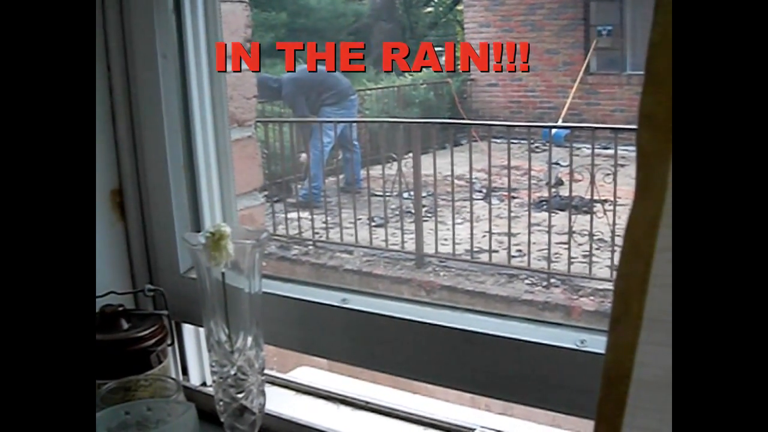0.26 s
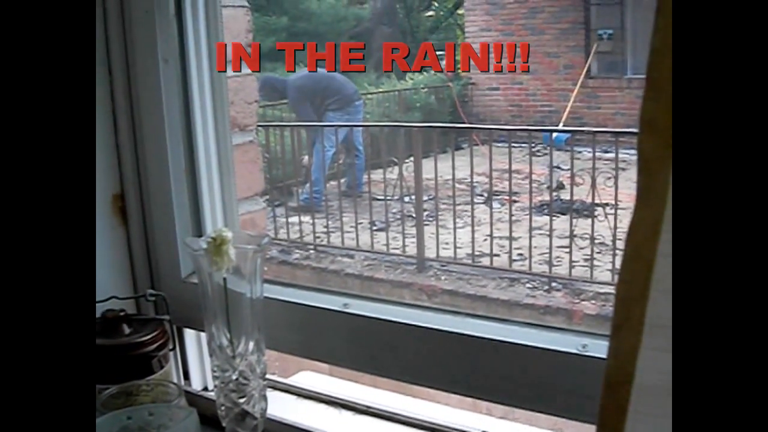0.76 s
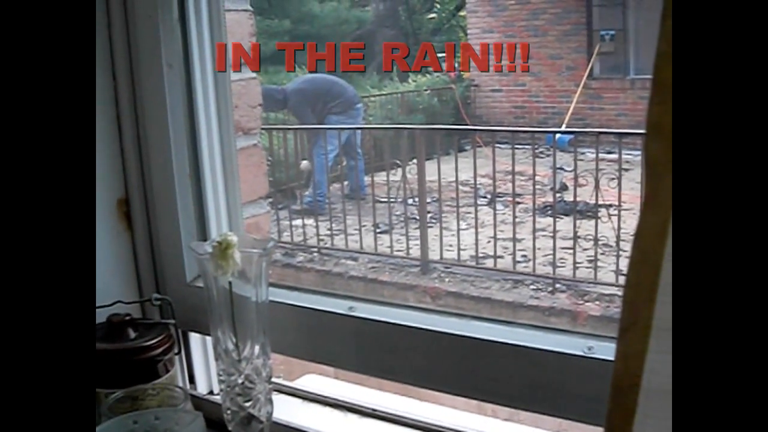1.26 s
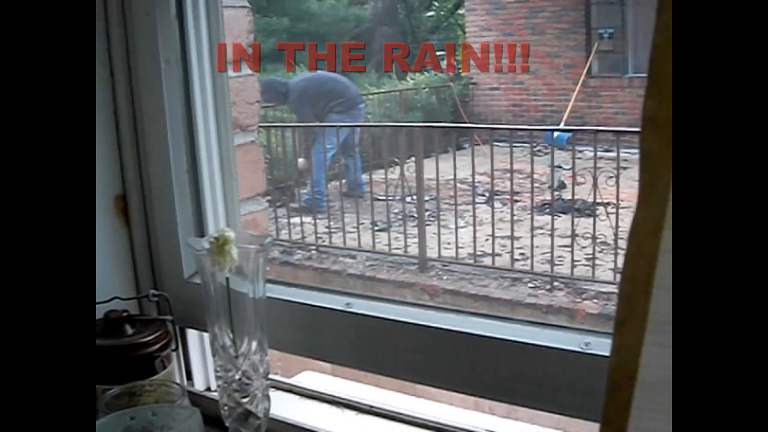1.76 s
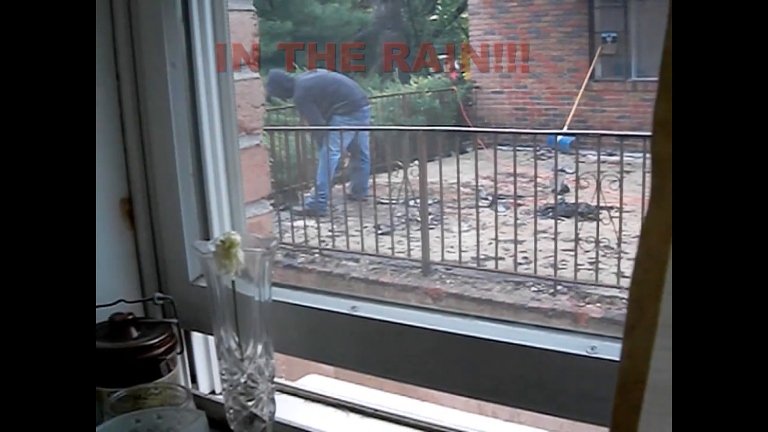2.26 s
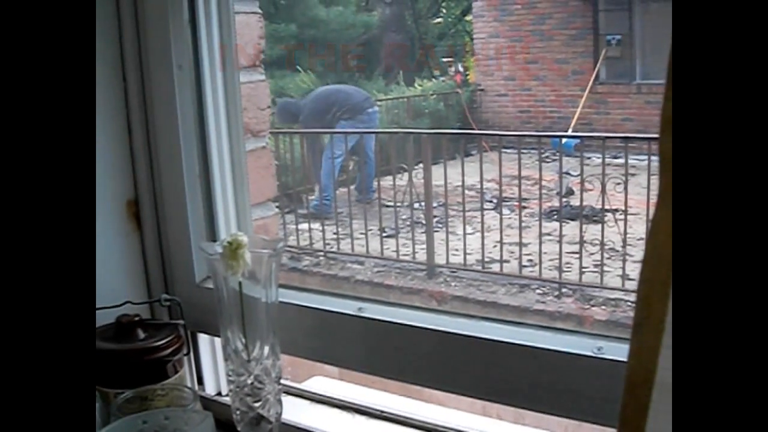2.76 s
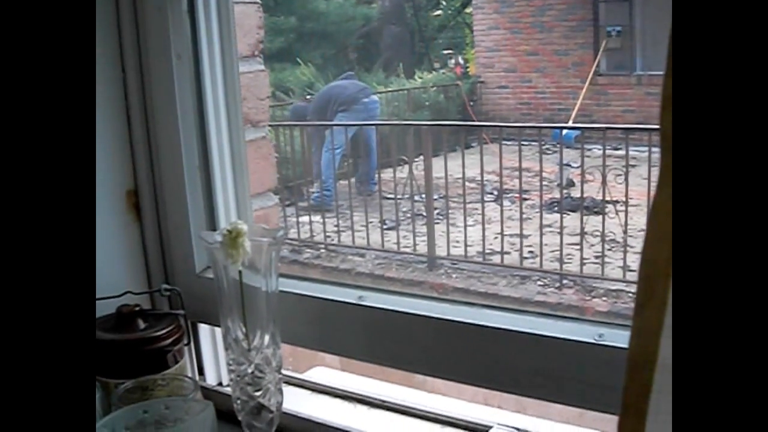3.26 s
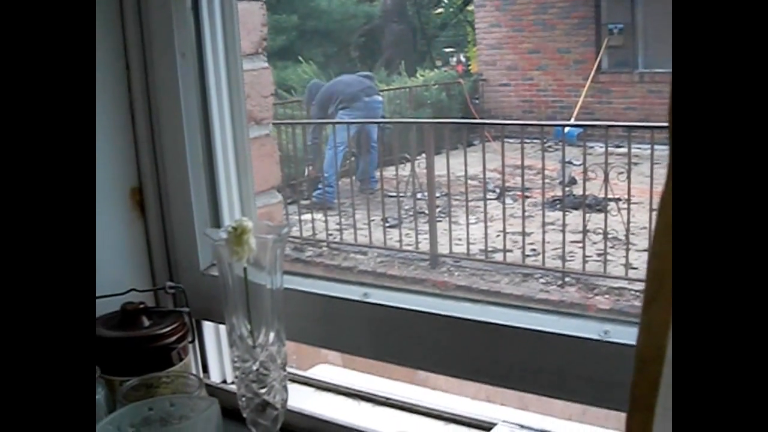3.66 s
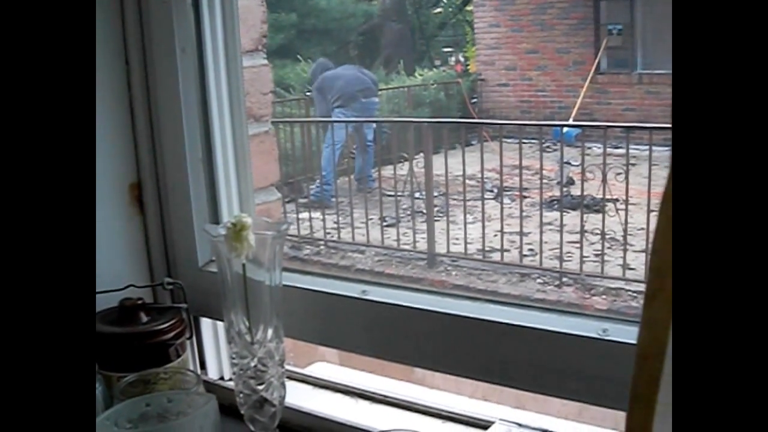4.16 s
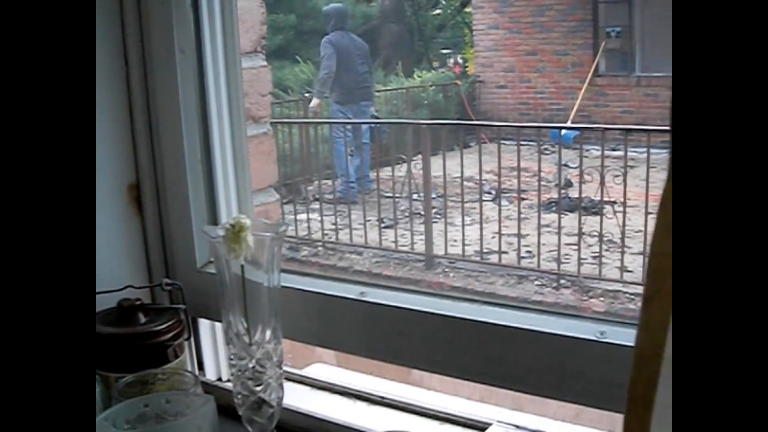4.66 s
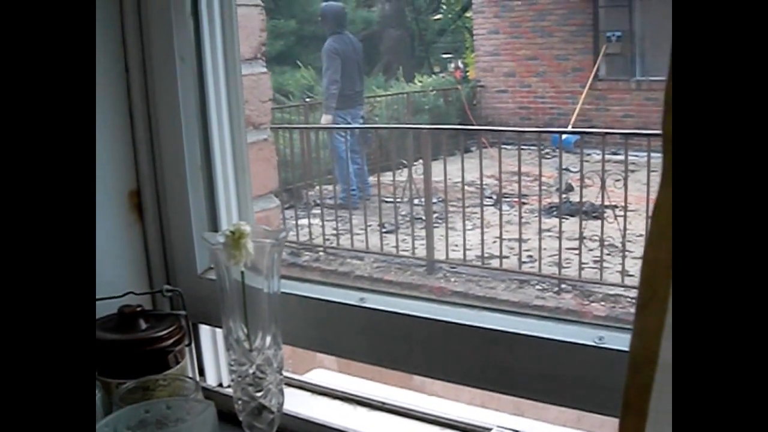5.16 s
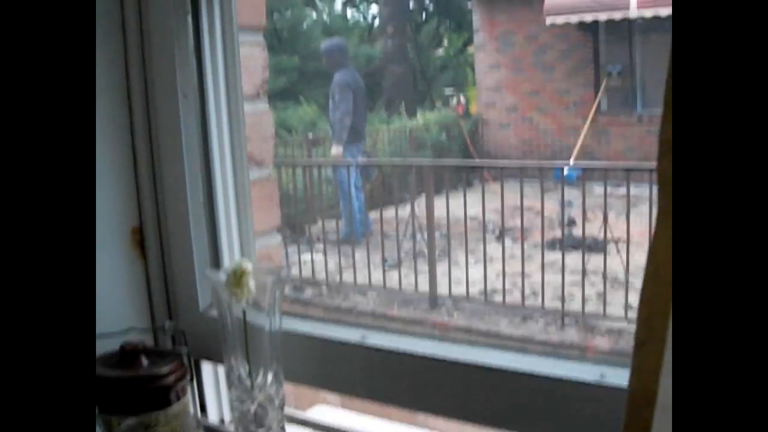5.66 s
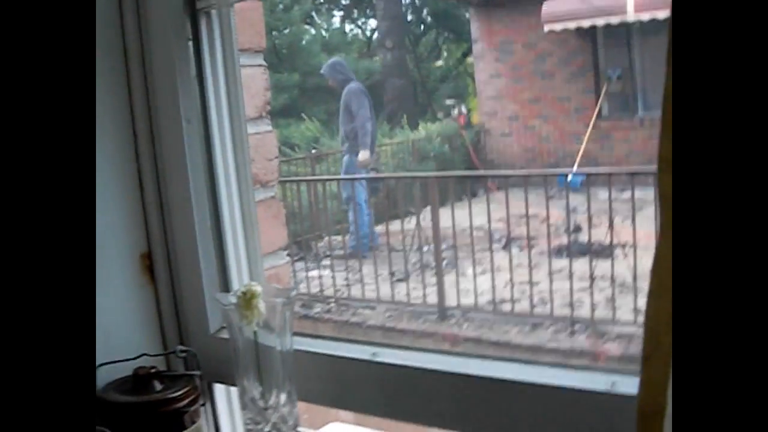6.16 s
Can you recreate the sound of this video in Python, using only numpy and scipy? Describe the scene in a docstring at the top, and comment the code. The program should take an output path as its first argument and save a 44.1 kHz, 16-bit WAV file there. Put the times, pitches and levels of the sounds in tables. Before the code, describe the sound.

An electric jackhammer hammers a brick-walled patio in two rattling bursts and a few short jabs, then rain hiss and faint motor hum continue.

```python
"""A patio between brick walls, in the rain, heard through an open window: a jackhammer breaks the slab.
Periodic blows excite resonances of slab, housing and steel: two long runs, then short jabs.
A chisel loose from the slab is less damped and rings as a bar; each blow sprays noise as grit is crushed.
Walls return the blows as echoes and a diffuse tail. Motor hum and thin chatter, rain and a low
outdoor wash, made of harmonics and filtered noise, sound throughout."""
import sys
import numpy as np
from scipy import signal
from scipy.fft import rfft, irfft
from scipy.io import wavfile

SR = 44100
rng = np.random.default_rng(int(sys.argv[2]) if len(sys.argv) > 2 else 0)


def output_pcm(signal):
    """Save a mono or channel-first signal as 16-bit PCM at the path in sys.argv[1].

    Samples are clipped to [-1, 1] before scaling.
    """
    pcm = np.clip(np.atleast_2d(signal).T, -1, 1) * 32767
    wavfile.write(sys.argv[1], SR, np.round(pcm).astype(np.int16))


N = 282240
TIME = np.arange(N) / SR

# outdoor wash, spectrum: frequency_hz, relative_level_db
WASH_SPECTRUM = [(10, -10), (27, 2), (48, -7), (90, -4.5), (140, -12), (180, -0.5), (280, -3.5),
                 (500, -8.5), (1000, -9), (2500, -17.5), (7000, -21.5), (15000, -36)]
# rain hiss, spectrum: frequency_hz, relative_level_db
HISS_SPECTRUM = [(500, -13.5), (1300, -5), (2400, 0.5), (3500, -1), (4900, 2), (5500, -6.5), (6150, 0),
                 (7800, -7.5), (9500, -11), (11000, -15), (13000, -12.5), (15700, -5.5)]
# near drops: time_s, level_db
NEAR_DROPS = [(5.497, -27), (5.868, -20), (5.936, -13)]
# splash of a near drop, spectrum: frequency_hz, relative_level_db
SPLASH_SPECTRUM = [(1000, -22), (3800, 2), (7000, -2), (10000, -15), (15000, -21)]
# slow level change shared by rain hiss and motor whirr: time_s, change_db
TREBLE_LEVEL = [(0, -1.5), (2.2, -5.5), (3.15, -5), (3.65, 0), (5.5, 0.5), (6.4, -1)]
# harmonics of the motor hum: multiple_of_crank_rate, relative_level_db
HUM_HARMONICS = [(1, -76), (4, -54), (5, -63.5), (6, -66.5), (9, -63), (13, -60.5), (17, -72)]
# resonances of the idling mechanism: frequency_hz, width_hz, relative_level_db
WHIRR_MODES = [(660, 180, -19), (1656, 43, -15.5), (1897, 45, -9.5), (2910, 35, -16), (3750, 130, -19),
               (4350, 87, -14.5), (4658, 51, -10), (6367, 27, -13.5), (6550, 130, -18), (9100, 71, -25),
               (12900, 60, -25)]
# early reflections off ground and walls: delay_s, gain
ECHOES = [(.0028, 0.37), (.0043, 0.28), (0.0104, 0.35)]
# reverberation time of the yard: frequency_hz, t60_s
YARD_DECAY = [(100, 1), (400, 0.45), (700, 0.41), (2000, 0.29), (6000, 0.52), (15000, 0.14)]
# short jabs: start_s, number_of_blows, force_db, slab_looseness (0-1)
JABS = [(2.4793, 1, -33.5, 0.4), (2.5418, 1, -23.5, 0.2), (2.6364, 4, -27, 0.09), (2.853, 2, -22.5, .03),
        (4.3843, 2, -27.5, .7), (4.540, 2, -26.5, 0.98), (4.637, 1, -34.5, 0.35)]
# thud of the slab in a jab, spectrum: frequency_hz, relative_level_db
JAB_THUD_SPECTRUM = [(35, -17), (90, -15), (130, 4.5), (180, -13), (250, -16), (300, -0.5), (400, 5),
                     (500, -8.5), (750, -14.5), (1300, -11.5), (1800, -14), (2400, -23), (6000, -33)]
# resonances of loose broken pieces: frequency_hz, width_hz, relative_level_db
PIECE_MODES = [(850, 94, -3), (1260, 310, -1.5), (1780, 380, -7), (2750, 1300, -16.5)]
# crushed grit, spectrum: frequency_hz, relative_level_db
GRIT_SPECTRUM = [(200, -2), (600, 23.5), (1100, 15.5), (1700, 14.5), (2300, 9), (3300, 6.5), (4600, 5),
                 (5500, -0.5), (6500, 2), (8000, -2.5), (10000, 3.5), (11000, -7.5), (12500, 3.5),
                 (15500, -7)]
# chisel free after a jab: start_s, time_until_damped_s, level_db, share_of_second_mode_set (0-1)
FREE_RINGS = [(2.481, 0.04, -38.5, 0.74), (2.543, 0.03, -45, 0.6), (2.716, .08, -39, 0),
              (2.866, 0.019, -36.5, 0.05), (2.905, 0.021, -42, .8), (4.592, .002, -36, 0.7)]
# bending modes of the chisel, two sets of rows: frequency_hz, relative_level_db
CHISEL_MODES = [
    [(4895, 8.5), (6135, 7)],
    [(3779, 10), (7246, 3.5), (9539, -17), (14800, 1)],
]
# crank pace, one list for each long run: time_s, stroke_rate_hz
RUN_PACES = [
    [(.006, 29.75), (.11, 32.98), (.35, 30.64), (.67, 29.42)],
    [(.997, 32.05), (1.07, 31.5), (1.15, 32.73), (1.35, 30.79), (1.6, 29.67), (1.82, 32.35)],
]
# bite of the chisel, one list for each long run: time_s, force_db
RUN_BITES = [
    [(0, -24.5), (.1, -27.5), (.2, -21.5), (.44, -20), (.585, -22), (.62, -25), (.66, -35)],
    [(1.0, -32), (1.1, -28), (1.24, -22.5), (1.35, -23.5), (1.47, -23.5), (1.6, -35), (1.68, -45.5),
     (1.82, -42)],
]
# thud of the slab in a long run, spectrum: frequency_hz, relative_level_db
RUN_THUD_SPECTRUM = [(30, -63), (75, -29), (180, -13), (250, -20.5), (300, -7), (400, -2.5), (530, -1.5),
                     (660, 1.5), (830, -8.5), (1050, -16.5), (1400, -8), (1850, -25), (2300, -34),
                     (5000, -40)]
# resonances of the slab: frequency_hz, width_hz, relative_level_db
SLAB_MODES = [(591, 56, 4.5), (637, 190, 0)]
# resonances of the tool housing: frequency_hz, width_hz, relative_level_db
HOUSING_MODES = [(1654, 142, -0.5), (1900, 80, -8.5)]
# steel ringing under load: frequency_hz, width_hz, relative_level_db
STEEL_MODES = [(2770, 110, -10.5), (4880, 110, -2), (9420, 130, -4), (10220, 120, -1), (11900, 150, -3.5),
               (12460, 500, -2)]
# knock of the loose chisel in its holder: frequency_hz, width_hz, level_re_blow_db
HOLDER_MODES = [(1480, 82, 16)]
# spans when the chisel works loose in the second run: start_s, end_s
LOOSE_SPANS = [(1.271, 1.69), (1.785, 2.1)]
# slow shake of the tool: multiple_of_stroke_rate, relative_level_db
SHAKE_HARMONICS = [(2, -13.5), (3, -2.5), (4, -0.5), (5, -10), (6, -7.5), (7, -8.5), (8, -17.5), (9, -12.5)]
# grit in a long run: level_at_full_force_db, slope_db_per_db, surge_db
RUN_GRIT_LAW = (-39.5, 0.58, 2.1)
# housing clank in a long run: level_at_full_force_db, slope_db_per_db, surge_db
RUN_CLANK_LAW = (-34, 0.82, 7.2)

RAIN_DB, WHIRR_DB = -47.5, -44  # before the treble change
FULL_FORCE_DB = -21
STROKE_S, BOUNCE_S = 0.0314, 0.0195  # jab: from blow to blow, from blow to bounce
BOUNCE_DB, BOUNCE_GROWTH = -2, 1.6  # at full looseness, re the blow; power of looseness
LOOSE_THUD_DB, LOOSE_GRIT_DB = -3.5, -3.5  # change at full looseness
HELD_RING_DB, LOOSE_RING_DB = -57, -43.5
BREAK_S, BREAK_WIDTH_S = 0.2, 0.14  # surge as the surface gives way, after the start of a run
EDGE_HZ = 15900


def amp(db):
    """Logarithmic level: decibels become an amplitude ratio."""
    return 10 ** (np.asarray(db) / 20)


def evened(x):
    """Power normalisation: scales to rms 1."""
    return x / np.sqrt(np.mean(x ** 2) + 1e-20)


def unit(x):
    """Energy normalisation: scales to energy 1."""
    return x / np.linalg.norm(x)


def read(points, hz):
    """Interpolation of a spectrum on a logarithmic frequency axis."""
    f, value = np.transpose(points)
    return np.interp(np.log(hz + 1), np.log(f + 1), value)


def ring(x, response):
    """Linear superposition: convolves x with an impulse response."""
    return signal.fftconvolve(x, response)[:N]


def clicks(s, db):
    """Ideal impulses: one sample-long click at each time."""
    places = np.clip(np.round(np.asarray(s) * SR).astype(int), 0, N - 1)
    return np.bincount(places, amp(db), N)


def knock(points, spread_s=0., size=4096):
    """Minimum-phase response of energy 1, with bending-wave dispersion delaying low notes in a slab."""
    hz = np.fft.fftfreq(size, 1 / SR)
    log_gain = np.log(amp(read(points, abs(hz))))
    minimum_phase = np.conj(signal.hilbert(log_gain))
    # the delay is spread_s at 500 Hz and falls as one over the root of frequency
    lag = 4 * np.pi * spread_s * np.sign(hz) * np.sqrt(500 * abs(hz))
    return unit(np.fft.ifft(np.exp(minimum_phase - 1j * lag)).real)


def modes(rows, size=4096):
    """Modal superposition: damped sines, with neighbours in opposite phase."""
    t = TIME[:size]
    total = np.zeros(size)
    for k, (hz, width, db) in enumerate(rows):
        mode = unit(np.exp(-np.pi * width * t) * np.sin(2 * np.pi * hz * t))
        total += (-1) ** k * amp(db) * mode
    return total


def noise(points):
    """Spectral shaping: steady filtered noise of rms 1."""
    gain = amp(read(points, np.fft.rfftfreq(N, 1 / SR)))
    return evened(irfft(rfft(rng.standard_normal(N)) * gain, N))


def drift(rate_hz):
    """Low-pass random modulation: a wander of rms 1."""
    gain = 1 / (1 + (np.fft.rfftfreq(N, 1 / SR) / rate_hz) ** 4)
    return evened(irfft(rfft(rng.standard_normal(N)) * gain, N))


def crumble(blows, decay_s, lumpy_db, rise_s=.001):
    """Granular fracture: the energy of each blow is released as a short, grainy spray of noise."""
    t = TIME[:8000]
    shape = np.exp(-t / decay_s) * (1 - np.exp(-t / rise_s))
    energy = ring(blows ** 2, shape / shape.sum())
    grains = evened(rng.standard_normal(N) * amp(lumpy_db * drift(550)))
    return np.sqrt(abs(energy)) * grains


def bar(rows):
    """Flexural vibration: bending modes of the chisel waver as it rattles in its holder."""
    waver_hz, shimmer_db = 55, 2.5
    total = np.zeros(N)
    for hz, db in rows:
        level = amp(db + shimmer_db * drift(83.3))
        cycles = np.cumsum(hz + waver_hz * drift(88.6)) / SR
        total += level * np.sin(2 * np.pi * cycles)
    return evened(total)


def follow(force_db, full_db, slope):
    """Power law: the level of a layer grows with the force of the blow."""
    return full_db + slope * (force_db - FULL_FORCE_DB)


def treble():
    """Slow gain change shared by rain hiss and motor whirr."""
    return amp(np.interp(TIME, *np.transpose(TREBLE_LEVEL)))


def background():
    """Broadband noise with random swell: the low outdoor wash."""
    swell = amp(.8 * drift(4))
    return amp(-48.0) * noise(WASH_SPECTRUM) * swell


def rain():
    """Random impacts: many drops merge into hiss, small ones patter, near ones splash."""
    size = amp(5.0 * np.minimum(rng.exponential(1, N), 5))
    falls = rng.random(N) < 700 / SR  # about 700 drops a second
    patter = evened(ring(rng.standard_normal(N) * size * falls, knock(HISS_SPECTRUM)))
    hiss = noise(HISS_SPECTRUM) * amp(.5 * drift(6.1)) + amp(-11.5) * patter
    drops = clicks(*np.transpose(NEAR_DROPS))
    near = ring(crumble(drops, decay_s=0.00051, lumpy_db=3, rise_s=0.00018), knock(SPLASH_SPECTRUM))
    return amp(RAIN_DB) * treble() * hiss + near


def idle(crank_hz=31.56, throb_db=0.5):
    """Periodic excitation: motor harmonics hum; piston and gear chatter throbs with the crank."""
    turns = np.cumsum(crank_hz + 0.299 * drift(3.21)) / SR
    hum = sum(amp(db + 1.1 * drift(9.3)) * np.sin(2 * np.pi * k * turns) for k, db in HUM_HARMONICS)
    throb = np.cos(2 * np.pi * turns) + np.cos(4 * np.pi * turns)
    chatter = evened(rng.standard_normal(N) * amp(throb_db * throb + 2.7 * drift(230)))
    # random signs make the excitation of each resonance independent
    whirr = sum(ring(chatter * rng.choice([-1, 1], N), modes([row])) for row in WHIRR_MODES)
    return amp(1) * hum + amp(WHIRR_DB) * treble() * whirr


def echoes(x):
    """Specular reflection: ground and near walls repeat each blow within milliseconds."""
    return x + sum(gain * np.interp(TIME - s, TIME, x, left=0) for s, gain in ECHOES)


def yard(x, build_s=0.011):
    """Diffuse reverberation between the houses, with a decay time that depends on frequency."""
    hz, t, z = signal.stft(rng.standard_normal(SR), SR, nperseg=256)
    decay = amp(-60 * t / read(YARD_DECAY, hz)[:, None])
    tail = signal.istft(z * decay, SR, nperseg=256)[1][:SR]
    return ring(x, unit(tail * (1 - np.exp(-TIME[:SR] / build_s))))


def jab_blows():
    """Rebound: blows come one stroke apart, and a loose slab bounces after each."""
    rows = []
    for start, count, force_db, loose in JABS:
        bounce_db = force_db + BOUNCE_DB + BOUNCE_GROWTH * 20 * np.log10(loose)
        for s in start + STROKE_S * np.arange(count):
            rows.append((s, force_db, loose))
            rows.append((s + BOUNCE_S, bounce_db, loose))
    return np.transpose(rows)


def jabs():
    """Impact and fracture: a few separate blows thud, crack pieces loose and crush grit."""
    s, force_db, loose = jab_blows()
    thud_db = force_db + LOOSE_THUD_DB * loose
    grit_db = follow(force_db, full_db=-34.5, slope=0.54) + LOOSE_GRIT_DB * loose
    crack_db = follow(force_db, full_db=-29.5, slope=0.56)
    thud = amp(25.5) * ring(clicks(s, thud_db), knock(JAB_THUD_SPECTRUM, spread_s=0.00039))
    crack_spray = crumble(clicks(s, crack_db), decay_s=0.0025, lumpy_db=-1.0, rise_s=0.00029)
    crack = amp(26.5) * ring(crack_spray, modes(PIECE_MODES))
    grit_spray = crumble(clicks(s, grit_db), decay_s=0.0037, lumpy_db=4, rise_s=0.0011)
    grit = amp(35.5) * ring(grit_spray, knock(GRIT_SPECTRUM))
    return thud, grit + crack


def chisel(t60=0.9, damp_s=0.019):
    """Contact damping: free of the slab, the steel bar rings until it touches down again."""
    envelopes = np.zeros((2, N))
    for s, length, db, share in FREE_RINGS:
        age = np.maximum(TIME - s, 0)
        levels = amp(db) * np.sqrt([[1 - share], [share]])
        touchdown = np.exp(-np.clip(age - length, 0, 1) / damp_s)
        envelopes += levels * (age > 0) * amp(-60 * age / t60) * touchdown
    return sum(envelope * bar(rows) for envelope, rows in zip(envelopes, CHISEL_MODES))


def long_run(pace, bite, rebound_turn=.77):
    """Periodic impact and recoil: the piston strikes once a turn, the chisel kicks back late in the turn."""
    pace_s, rate = np.transpose(pace)
    running = (TIME >= pace_s[0]) & (TIME < pace_s[-1])
    turns = np.cumsum(np.interp(TIME, pace_s, rate) * running) / SR
    strike = np.flatnonzero(np.diff(np.ceil(turns)))
    kick = np.flatnonzero(np.diff(np.floor(turns - rebound_turn)))
    kick_s = TIME[kick] + 0.00039 * rng.standard_normal(len(kick))

    def strokes(db, kick_db, uneven_db):
        """Random variation of force: strikes and their weaker kicks, no two equally hard."""
        strike_levels = db[strike] + uneven_db * rng.standard_normal(len(strike))
        kick_levels = db[kick] + kick_db + uneven_db * rng.standard_normal(len(kick))
        return clicks(TIME[strike], strike_levels) + clicks(kick_s, kick_levels)

    blow_db = np.interp(TIME, *np.transpose(bite))
    # grit and clanking surge briefly as the surface gives way
    surge = np.exp(-((TIME - pace_s[0] - BREAK_S) / BREAK_WIDTH_S) ** 2)
    grit_full_db, grit_slope, grit_surge_db = RUN_GRIT_LAW
    grit_db = follow(blow_db, grit_full_db, grit_slope) + grit_surge_db * surge
    clank_full_db, clank_slope, clank_surge_db = RUN_CLANK_LAW
    clank_db = follow(blow_db, clank_full_db, clank_slope) + clank_surge_db * surge
    loose = sum((TIME > start) & (TIME < end) for start, end in LOOSE_SPANS)

    blows = strokes(blow_db, kick_db=-15, uneven_db=0.26)
    slab = amp(26) * knock(RUN_THUD_SPECTRUM, spread_s=0.000682) + amp(24.5) * modes(SLAB_MODES)
    thud = ring(blows, slab)
    clank = amp(27) * ring(strokes(clank_db, kick_db=-4.5, uneven_db=2.5), modes(HOUSING_MODES))
    holder_knock = ring(blows * loose, modes(HOLDER_MODES))

    scrapes = strokes(grit_db, kick_db=-4.0, uneven_db=1.5)
    spray = crumble(scrapes, decay_s=.0055, lumpy_db=2.2, rise_s=.0018)
    grit = ring(spray, amp(37.5) * knock(GRIT_SPECTRUM)) + ring(spray, amp(21.5) * modes(STEEL_MODES))

    # every strike renews the ring of the chisel
    ring_db = np.where(loose, LOOSE_RING_DB, HELD_RING_DB)
    ring_envelope = ring(clicks(TIME[strike], ring_db[strike]), np.exp(-TIME[:8000] / 0.033))
    steel = bar(CHISEL_MODES[0]) * ring_envelope

    # the tool keeps shaking even when the bite is weak
    weight = ring(amp(0.48 * blow_db) * running, np.exp(-TIME[:8000] / 0.03) / (0.037 * SR))
    shake = weight * sum(amp(db) * np.sin(2 * np.pi * k * turns) for k, db in SHAKE_HARMONICS)
    return thud, grit + clank + holder_knock, steel, amp(-23.0) * shake


def scene():
    """Superposition of direct sound, echoes and yard tail, with motor, rain and wash."""
    runs = [np.array(long_run(pace, bite)) for pace, bite in zip(RUN_PACES, RUN_BITES)]
    run_thud, run_grit, run_steel, shake = sum(runs)
    jab_thud, jab_grit = jabs()
    run_thud, jab_thud = echoes(run_thud), echoes(jab_thud)
    grit, steel = run_grit + jab_grit, run_steel + chisel()
    thud_send = amp(-7.0) * run_thud + amp(-9.0) * jab_thud
    tail = yard(thud_send + amp(-3.0) * grit + amp(-11) * steel + amp(-13.0) * shake)
    hammer = run_thud + jab_thud + grit + steel + shake
    return (hammer + tail + idle() + rain() + background())[None]


def record(dry):
    """Band limitation: a linear-phase low-pass removes the top of the treble."""
    low_pass = signal.firwin(511, EDGE_HZ, window=("kaiser", 9), fs=SR)
    return signal.oaconvolve(dry, low_pass[None], "same")


dry = scene()
out = record(dry)
output_pcm(out)
```